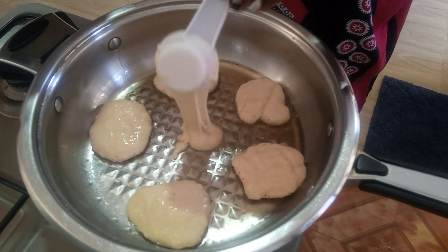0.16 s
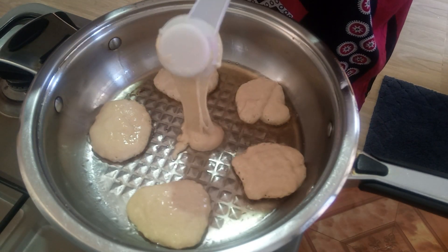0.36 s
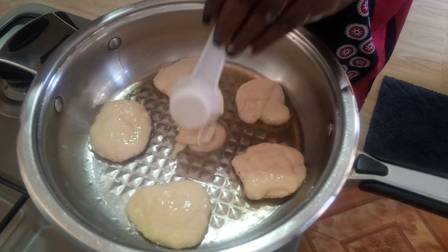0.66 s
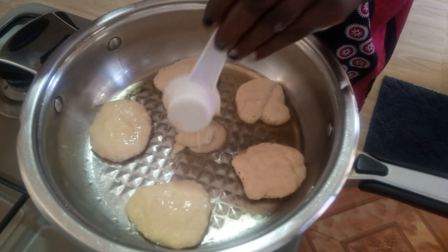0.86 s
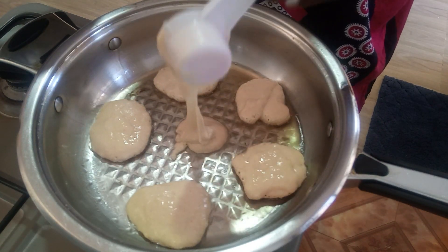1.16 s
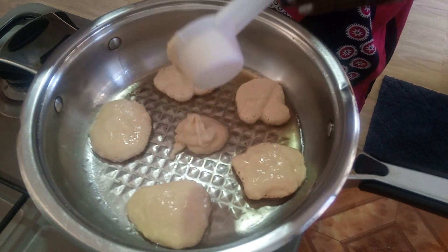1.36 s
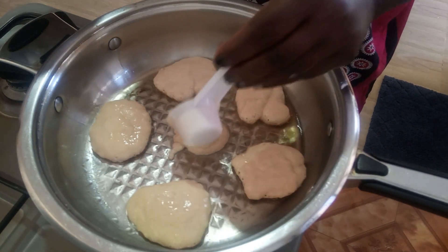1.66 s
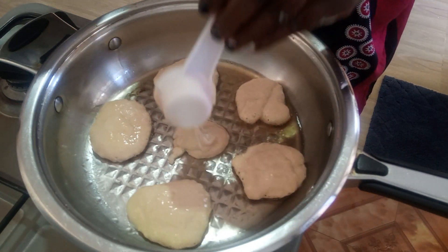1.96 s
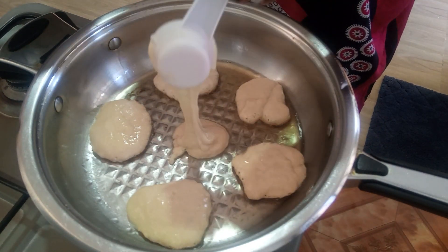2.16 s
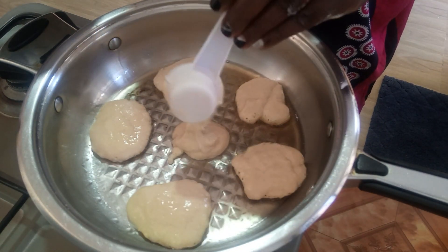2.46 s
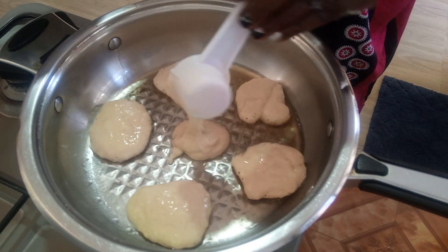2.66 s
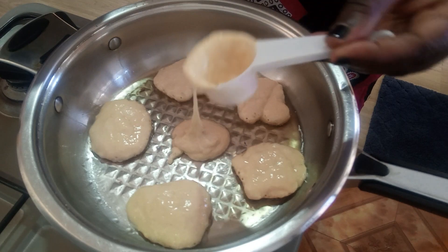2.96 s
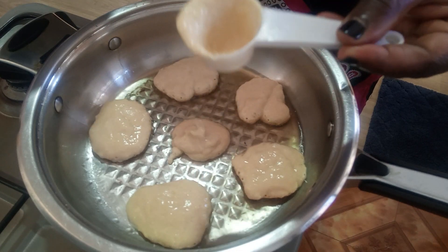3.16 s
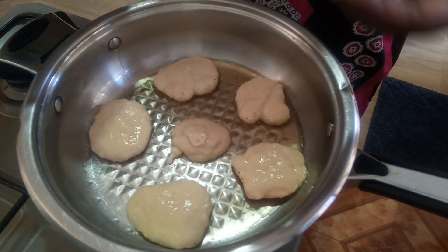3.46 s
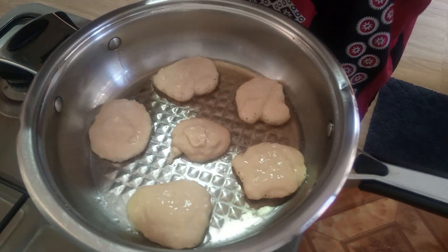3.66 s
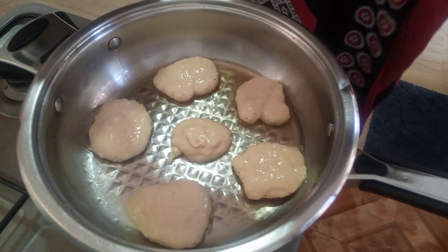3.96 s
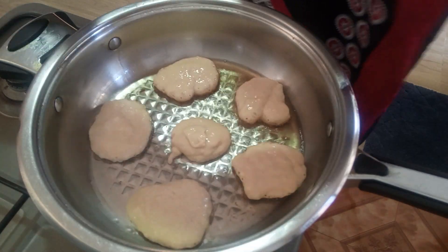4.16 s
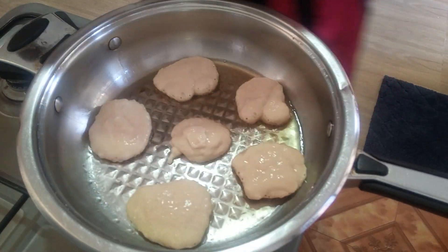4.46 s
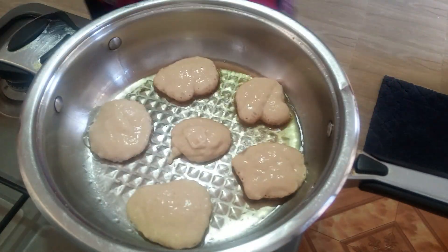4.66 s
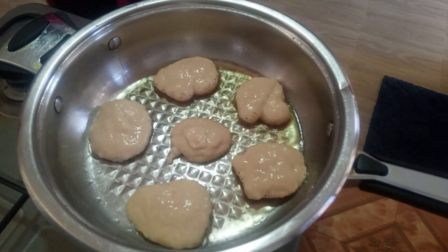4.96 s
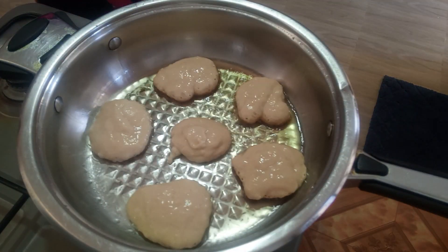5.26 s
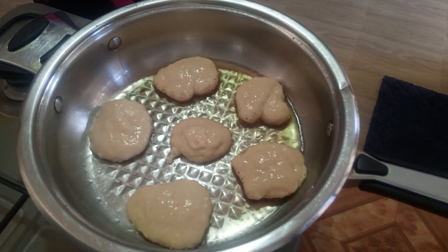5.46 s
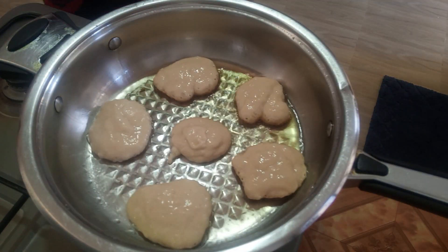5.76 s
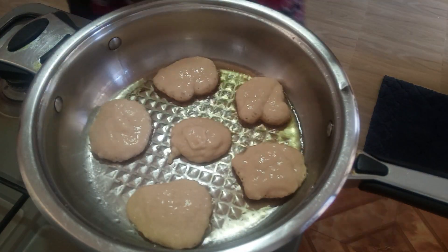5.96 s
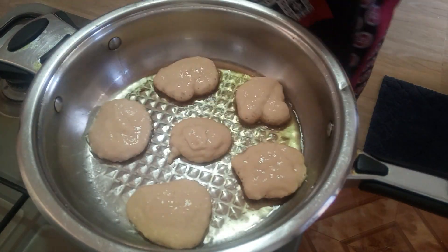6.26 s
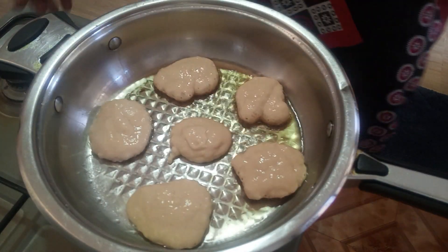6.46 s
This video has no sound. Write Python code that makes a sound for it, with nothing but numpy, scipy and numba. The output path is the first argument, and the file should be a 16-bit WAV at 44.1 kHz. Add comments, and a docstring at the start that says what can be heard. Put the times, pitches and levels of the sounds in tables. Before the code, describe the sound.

Spoonfuls of batter fry in shallow oil in a steel pan, heard very close and in mono in a small kitchen. A dense, bright sizzle runs throughout, with crisp spits and a soft, wavering hollow bubbling beneath. A faint knock and scuff come after four seconds, then a solid dull thud, a softer one, and a light clatter near six seconds while the oil spits harder.

```python
"""Batter frying in a steel pan

Spoonfuls of batter fry in shallow oil, heard close up in mono in a small kitchen.
Thousands of random impulses ring short resonances as bursting steam bubbles; snaps with brief rings are spits.
The air in the pan hums through a gliding resonance, its pitch shifting as a hand moves over it.
Later the cook puts things aside: decaying modes give two dull thuds and two very faint ones,
and filtered noise and impulses give light knocks and scuffs, over a faint low rush and mains hum."""
import sys
import numpy as np
from scipy import signal
from scipy.fft import rfft, irfft
from scipy.io import wavfile
from scipy.ndimage import uniform_filter1d
from numba import njit

SR = 44100
rng = np.random.default_rng(int(sys.argv[2]) if len(sys.argv) > 2 else 0)


def persist_wave(psi):
    """Save psi, clipped to +-1, as 16-bit WAV."""
    counts = np.round(np.clip(psi, -1, 1) * 32767).astype(np.int16)
    wavfile.write(sys.argv[1], SR, np.atleast_2d(counts).T)


N = 291942
TIME = np.arange(N) / SR  # s
FLUTTERS_PER_S = 31  # pace of the uneven stirring of air and sputter


def undb(db):
    """Decibels to gain."""
    return 10 ** (np.asarray(db) / 20)


def level(x, db, span=None):
    """Scale x to an rms level, taken over its first span seconds or over all of it."""
    head = x if span is None else x[:int(span * SR)]
    return x * undb(db) / np.sqrt(np.mean(head ** 2))


def curves(rows):
    """Each column of a table after the time, as a control sample by sample."""
    s, *columns = np.transpose(rows)
    return [np.interp(TIME, s, column) for column in columns]


def add(out, s, x):
    """Mix x into out from time s."""
    i = int(s * SR)
    out[i:i + len(x)] += x[:N - i]


def fade(t60):
    """One second of exponential decay, falling 60 dB in t60 seconds."""
    return np.exp(-np.log(1000) * TIME[:SR] / t60)


def cut(x, order, hz, kind="low"):
    """Butterworth filter: "low" keeps what lies below hz, "high" what lies above."""
    return signal.sosfilt(signal.butter(order, hz, kind, fs=SR, output="sos"), x)


def colour(x, points):
    """Filter by a gain curve of (Hz, dB) points, joined along log frequency."""
    hz, db = np.transpose(points)
    f = np.maximum(np.fft.rfftfreq(len(x), 1 / SR), 1)
    gain = undb(np.interp(np.log(f), np.log(hz), db))
    return irfft(rfft(x) * gain, len(x))


@njit
def svf(x, g, k):
    """State-variable band-pass whose tuning g and damping k may move."""
    y, b, l = np.empty(len(x)), 0., 0.
    for i in range(len(x)):
        v = (b + g[i] * (x[i] + 1e-18 - l)) / (1 + g[i] * (g[i] + k[i]))
        b, l, y[i] = 2 * v - b, l + 2 * g[i] * v, k[i] * v
    return y


def resonate(x, hz, width_hz):
    """One resonance, gain 1 at its centre."""
    angle = 2 * np.pi * np.minimum(hz, .45 * SR) / SR * np.ones(len(x))
    return svf(x, np.tan(angle / 2), 2 * np.pi * width_hz / SR / np.sin(angle))


def resonate_twice(x, hz, width_hz):
    """Two equal resonances in a row, for steeper skirts."""
    return resonate(resonate(x, hz, width_hz), hz, width_hz)


def walk(rate):
    """Smooth random wander around 0 with a spread near 1, taking about rate steps a second."""
    k = int(SR / rate)
    steps = np.repeat(rng.standard_normal(N // k + 1), k)
    return np.sqrt(2) * uniform_filter1d(uniform_filter1d(steps, k), k)[:N]


def bursts(rate, spread_db, most_db=22):
    """Impulses at random moments, about rate a second: many small, a few large."""
    size = undb(np.minimum(spread_db * rng.exponential(size=N), most_db))
    return (rng.random(N) < rate / SR) * size * rng.choice([-1, 1], N)


def echoes(x, delay, t60, db):
    """Add a cloud of reflections that starts after a delay and dies away."""
    cloud = (rng.standard_normal(SR) * fade(t60))[:len(x)]
    cloud = np.r_[np.zeros(int(delay * SR)), cloud / np.linalg.norm(cloud)]
    return x + undb(db) * signal.fftconvolve(x, cloud)[:len(x)]


def moving_echoes(x, delay, share, sway, count=3):
    """Reflections off the cook's moving hand and body carve shifting hollows into a sound."""
    out = x
    for k in range(count):
        lag = delay * 1.7 ** k + sway * walk(3.5)
        out = out + share * np.interp(TIME - lag, TIME, x)
    return out


def steady(x, db):
    """Hold the slow level of x to a curve in dB, leaving its quick flutter."""
    size = SR // 12
    power = uniform_filter1d(uniform_filter1d(x ** 2, size), size)
    return x * undb(db) / np.sqrt(power)


def sizzle():
    """Tiny steam bubbles burst at random, each ringing a few cycles in one of ten pitch bands."""
    # the frying as it swells and sinks, before small trims:
    # (time [s], level of the bursting bubbles [dB], level of the finest fizz [dB])
    sizzle_levels = [(0.0, -55.5, -54.5), (0.42, -57.5, -57.5), (1.73, -56.5, -57), (2.51, -57.5, -57),
                     (2.86, -57, -58.5), (3.37, -59, -58.5), (4.46, -55.5, -57.5), (4.61, -57.5, -60),
                     (5.07, -56, -58.5), (5.79, -56.5, -59), (6.23, -55, -58.5), (6.62, -53, -54.5)]
    # colour of the bursting oil up close: (frequency [Hz], relative gain [dB])
    sizzle_colour = [(400, -26), (1200, -14.5), (2400, -7.5), (2800, 4), (3150, -3), (3450, 3.5),
                     (4200, 3.5), (4900, 2), (6900, 3.5), (7800, -7), (9000, -11.5), (13000, -7.5),
                     (16000, -12)]
    bubble_db, fizz_db = curves(sizzle_levels)
    grains = 0
    for hz in np.geomspace(2000, 15000, 10):
        band = resonate(bursts(rate=1100, spread_db=2.5, most_db=30.5), hz, 0.37 * hz)
        grains = grains + level(band, 0) * np.sqrt(hz) * undb(2.47 * walk(17))
    snaps = bursts(rate=1200, spread_db=1.5, most_db=18)
    # their countless reflections merge into a smooth hiss
    wash = level(rng.standard_normal(N), -2.7) * undb(.5 * walk(46))
    sound = colour(level(grains, 0) + level(snaps, -2.3) + wash, sizzle_colour)
    # bubbles below 8 kHz, fizz above, each with its own level curve
    bubbles = signal.sosfiltfilt(signal.butter(8, 8000, fs=SR, output="sos"), sound)
    fizz = sound - bubbles
    return level(bubbles, 0.66) * undb(bubble_db) + level(fizz, 1.0) * undb(fizz_db)


def spit(db, hz, snap_db):
    """A pocket of steam breaks through the oil: a snap and a very short ring."""
    impulse = signal.unit_impulse(8192)
    # the ring is 1550 Hz wide at 6 kHz with snap and ring equal; snappier spits ring more broadly
    width_hz = 1550 * np.sqrt(hz / 6000) * 2 ** (snap_db / 40)
    ring = level(resonate(resonate(impulse, hz, width_hz), hz, 3 * width_hz), 0)
    crack = level(resonate_twice(impulse, 10600, 38000), snap_db)
    pop = cut(ring + crack, 2, 2000, "high")
    # each spot has its own paths via the pan wall
    pop = echoes(pop, delay=0.0006, t60=0.015, db=-4.5)
    # the kitchen gives back less of the highest pops
    pop = echoes(pop, delay=0.0049, t60=0.15, db=-12.5 - 1.4 * np.log2(hz / 6000))
    return level(pop, db - 1.5, span=.005)


def spits():
    """The oil spits loudly at set moments, and faintly at random in between."""
    # the loudest spits: (time [s], level over the first 5 ms before a 1.5 dB cut [dB],
    # pitch [Hz], snap relative to ring [dB])
    loud_spits = [(0.0522, -37.5, 12100, -6), (0.1262, -43, 4900, 9), (0.6428, -42.5, 13600, 1),
                  (0.8089, -44, 6500, -14), (1.072, -41, 13700, -3), (1.4144, -40.5, 7300, -3),
                  (1.4767, -47, 9300, -16), (1.7392, -41, 6960, 19), (1.808, -46.5, 8850, -2),
                  (1.947, -45.5, 4260, 15), (2.0183, -47, 10700, -20), (2.134, -37, 6560, 3),
                  (2.18, -43.5, 8740, -16), (2.676, -47.5, 6800, 2), (2.7448, -43, 11000, -14),
                  (2.8196, -41.5, 5370, 0), (2.8717, -36, 6400, -3.5), (2.8898, -45, 11400, -12),
                  (2.919, -48, 6800, -16), (3.0016, -47, 13900, -12), (3.291, -45.5, 6100, 5),
                  (3.333, -53, 9000, -8), (3.5536, -44, 7000, 4), (4.0852, -40, 4570, 7),
                  (4.084, -41, 11900, 27), (4.0976, -45, 11800, 5), (4.1514, -42.5, 7000, -3),
                  (4.2906, -31.5, 12500, -3), (4.4657, -45, 13400, 4), (4.4907, -32, 12100, 12),
                  (4.781, -43, 4530, 1), (4.8973, -47, 10800, -10), (4.9122, -44.5, 6300, 5),
                  (4.9412, -46, 3520, 4), (4.996, -45, 13600, 2), (5.2062, -43.5, 7540, -17),
                  (5.2257, -39.5, 6800, 6), (5.2675, -38, 14100, -3), (5.3204, -35, 4180, -14),
                  (5.415, -43, 4420, -5), (5.6434, -40, 5870, -4), (5.6451, -33.5, 5300, -8),
                  (5.6652, -48, 6400, 6), (5.69, -40.5, 3680, -7), (5.7977, -47, 9700, -7),
                  (5.8578, -43.5, 5400, 6), (5.8752, -29.5, 6040, -6), (5.9727, -37, 5900, -6),
                  (6.1116, -38, 5570, -7), (6.1136, -29.5, 5530, -6), (6.1175, -36.5, 5950, -3),
                  (6.2091, -41, 6600, -4), (6.2432, -39, 14000, 0), (6.246, -30, 5730, 5),
                  (6.257, -40, 11700, -17), (6.2793, -41, 5570, 15), (6.355, -45.5, 7200, -5),
                  (6.5489, -43, 5270, 8)]
    faint_per_s, faint_db, spread_db, faint_snap_db = 4.0, -50, 3.5, -5  # level before the same cut
    low_hz, high_hz = 5700, 13200
    out = np.zeros(N)
    for s, db, hz, snap_db in loud_spits:
        add(out, s, spit(db, hz, snap_db))
    # 64 candidates, of which chance keeps about faint_per_s each second
    for when, size, pitch, chance in rng.random((64, 4)):
        hz = low_hz * (high_hz / low_hz) ** pitch
        pop = spit(faint_db + spread_db * (2 * size - 1), hz, faint_snap_db)
        if chance * 64 < faint_per_s * TIME[-1]:
            add(out, when * TIME[-1], pop)
    return out


def pings():
    """A flying drop of oil leaves one thin, short ring in the steel: a decaying sine."""
    # drops on the steel: (time [s], level over the first 4.1 ms [dB], pitch [Hz], t60 [s])
    drops = [(5.6455, -49, 5200, 0.081), (5.6904, -48, 4170, 0.088), (6.1122, -41, 5810, 0.079)]
    out = np.zeros(N)
    for s, db, hz, t60 in drops:
        tone = np.sin(2 * np.pi * hz * TIME[:SR]) * fade(t60)
        add(out, s, level(tone, db, span=0.0041))
    return out


def ring_steel(x):
    """The steel of the pan answers a sound with its narrow resonances."""
    # ringing of the steel: (frequency [Hz], width [Hz], gain [dB])
    pan_modes = [(548.3, 10, 13), (926, 14, 11)]
    return sum(undb(db) * resonate(x, hz, width_hz) for hz, width_hz, db in pan_modes)


def pan_air():
    """The bubbling stirs the air in the pan, whose resonance follows the hand above it and rings the steel."""
    # the air in the pan as the hand moves over it: (time [s], lowest resonance [Hz])
    air_pitch = [(0, 713), (0.16, 737), (0.38, 600), (0.46, 714), (0.54, 634), (0.59, 830), (0.68, 660),
                 (0.92, 820), (1.03, 726), (1.29, 820), (1.36, 710), (1.5, 770), (1.55, 650), (1.65, 710),
                 (1.85, 736), (2.01, 787), (2.17, 700), (2.25, 900), (2.31, 656), (2.6, 694), (2.67, 613),
                 (2.8, 614), (2.98, 783), (3.48, 608), (3.64, 720), (3.86, 550), (4.05, 700), (4.46, 734),
                 (4.66, 660), (5.02, 758), (5.4, 560), (5.9, 633), (6.38, 774), (6.62, 687)]
    # level of that resonance together with the steel it rings: (time [s], level [dB])
    air_level = [(0, -56.5), (0.14, -65.5), (0.33, -68), (0.48, -63.5), (0.63, -70.5), (0.7, -65.5),
                 (0.8, -69.5), (0.92, -62.5), (1.02, -68), (1.11, -65.5), (1.22, -68.5), (1.32, -66.5),
                 (1.38, -66.5), (1.46, -64.5), (1.55, -77), (1.69, -65.5), (1.85, -66), (1.95, -65),
                 (2.13, -66.5), (2.21, -70.5), (2.33, -66), (2.48, -72.5), (2.58, -67), (2.7, -63),
                 (2.78, -66.5), (2.85, -72.5), (2.96, -63), (3.08, -70.5), (3.2, -66), (3.38, -70.5),
                 (3.55, -65.5), (3.76, -74), (3.88, -68), (4.0, -85), (4.13, -72), (4.3, -67.5),
                 (4.44, -74.5), (4.54, -65), (4.8, -66.5), (5.03, -69.5), (5.45, -59.5), (5.85, -60),
                 (6.0, -63.5), (6.3, -65), (6.62, -63.5)]
    [hz], [air_db] = curves(air_pitch), curves(air_level)
    stirring = bursts(rate=1500, spread_db=1.5)
    air = resonate(resonate(stirring, hz * (1 + 0.025 * walk(22)), 130), hz, 210)
    air = cut(air, 6, 470, "high")
    air = moving_echoes(air, delay=0.00285, share=0.3, sway=0.00075)
    air = air * undb(1.0 * walk(FLUTTERS_PER_S))
    return steady(air + undb(-0.5) * ring_steel(air), air_db)


def sputter():
    """Larger bubbles sputter through broad, overlapping resonances that wander and sink away now and then."""
    # resonances of the sputter: (centre [Hz], level before the sinking [dB])
    sputter_modes = [(1170, -3), (1380, 2), (1560, -5.5), (1740, -1), (1930, -3), (2120, -4.5), (2310, 1),
                     (2520, -12)]
    # slow level of the whole sputter: (time [s], level [dB])
    sputter_level = [(0, -62.5), (0.2, -66.5), (0.33, -65), (0.62, -69), (0.92, -65), (1.06, -72),
                     (1.33, -68), (1.55, -69.5), (1.91, -64.5), (2.07, -72), (2.32, -64.5), (2.48, -66.5),
                     (2.57, -78), (2.66, -68.5), (3.22, -68), (3.36, -74), (3.55, -79.5), (3.74, -69),
                     (3.84, -76), (3.92, -72), (4.02, -73.5), (4.45, -66.5), (4.55, -63), (4.79, -62.5),
                     (5.03, -67), (5.87, -62), (6.0, -69), (6.3, -61.5), (6.62, -62)]
    width_hz, drift, hollow_db, hollows_per_s = 250, 0.035, 7, 13  # drift as a share of the pitch
    [sputter_db] = curves(sputter_level)
    sound = 0
    for centre_hz, db in sputter_modes:
        centre = centre_hz * (1 + drift * walk(9))
        mode = resonate_twice(bursts(rate=1200, spread_db=1.0), centre, width_hz)
        sound = sound + level(mode, db) * undb(-hollow_db * np.abs(walk(hollows_per_s)))
    sound = moving_echoes(sound, delay=.0019, share=0.47, sway=0.000402)
    return steady(sound * undb(1.3 * walk(FLUTTERS_PER_S)), sputter_db)


def thuds():
    """Padded blows ring the furniture's modes; a lower upper limit leaves mostly the low ones."""
    # modes of the furniture: (frequency [Hz], level before tilt and wobble [dB], t60 before the choke [s])
    thud_modes = [(100.4, -13.5, 0.48), (131.5, -17.5, 0.34), (152.4, -16, 0.31), (166.5, -11.5, 0.68),
                  (197, -11, 0.3), (231, -18.5, 0.36), (261, -12, 0.27), (330, -13.5, 0.29),
                  (384.6, -8, 0.27), (420.4, -9, 0.17), (469, -5, 0.3), (510, -6, 0.24), (550, 2.5, 0.12),
                  (572, -11, 0.15), (668, -5, 0.23), (694, -13.5, 0.55), (735, -18, 0.24), (760, -6, 0.25),
                  (836, -15, 0.33), (885, -19, 0.13), (970, -26, 0.4), (1100, -16, 0.18), (1220, -12, 0.2)]
    # the blows: (time [s], level over the first 47 ms [dB], brightness [dB per octave], upper limit [Hz])
    thud_blows = [(5.2361, -27.5, 0.2, 1000), (5.4929, -38, -6, 597), (6.06, -65.5, 2.5, 248),
                  (6.093, -64, 5.5, 248)]
    choke_s, choke_slope = 0.29, 0.25  # the lowest mode is choked after this long, higher ones sooner
    wobble_depth_db, wobbles_per_s = 3.5, 30.5  # each mode dies unevenly
    out, t = np.zeros(N), TIME[:SR]
    for s, db, tilt_db, top_hz in thud_blows:
        ring = np.zeros(SR)
        for hz, mode_db, t60 in thud_modes:
            phase = rng.uniform(-2.12, 1) * 1.2
            tone = np.sin(2 * np.pi * hz * t + phase) * fade(t60)
            # the room blurs each mode briefly
            blur = resonate_twice(rng.standard_normal(SR), hz, 0.3 * hz)
            blur = level(blur, -12) * fade(1.5 * t60)
            # low modes take longer to build up
            onset = 1 - np.exp(-t * hz / 0.53)
            ratio = hz / thud_modes[0][0]
            choke = np.exp(-(t * ratio ** choke_slope / choke_s) ** 10)
            wobble_db = wobble_depth_db * walk(wobbles_per_s)[:SR]
            gain = undb(mode_db + tilt_db * np.log2(ratio) + wobble_db)
            ring += gain * (tone + blur) * onset * choke
        # the blow itself, a couple of cycles long
        push = resonate(resonate(signal.unit_impulse(SR), 418, 180), 320, 470)
        body = level(ring, 0, span=0.073) + level(push, -6.5, span=0.07)
        padded = cut(cut(body, 6, top_hz), 4, 76, "high")
        add(out, s, level(padded, db, span=0.047))
    return out


def knocks():
    """Utensils put down: a light blow and a short noisy rattle ring one broad resonance."""
    # the knocks: (time [s], level over the first 23 ms [dB], pitch [Hz], width [Hz], t60 of the rattle [s])
    light_knocks = [(4.163, -52, 616, 150, 0.28), (4.19, -59, 635, 190, 0.3), (4.236, -62, 860, 500, 0.16),
                    (4.261, -61, 1090, 450, 0.15), (6.0605, -43, 744, 250, 0.11),
                    (6.079, -51, 790, 322, 0.15), (6.097, -51.5, 550, 300, 0.14)]
    out = np.zeros(N)
    for s, db, hz, width_hz, t60 in light_knocks:
        blow = 16 * signal.unit_impulse(SR) + rng.standard_normal(SR) * fade(t60)
        ring = resonate(resonate(blow, hz, width_hz), hz, 3 * width_hz)
        add(out, s, level(cut(ring, 4, 470, "high"), db, span=0.023))
    return out


def scuffs():
    """Dense little slips merge into a rough rub that swells and dies away in one broad resonance."""
    # things slid along the worktop: (time [s], rise [s], length [s], rms level at the peak of the swell [dB],
    # centre [Hz], width [Hz])
    slides = [(4.083, 0.089, 0.27, -59, 1600, 1200), (4.522, 0.014, 0.11, -46.5, 3000, 2820),
              (6.012, 0.007, 0.14, -50.5, 1880, 1310), (6.022, 0.03, 0.4, -52, 910, 1020),
              (6.11, 0.045, 0.11, -48, 2190, 1100), (6.142, 0.051, 0.056, -55.5, 385, 328),
              (6.182, 0.0095, 0.088, -48, 2290, 900)]
    out = np.zeros(N)
    for s, rise, length, db, hz, width_hz in slides:
        # the rubbing catches and lets go, 1 dB at about 120 steps a second
        slips = bursts(rate=4400, spread_db=10.0, most_db=14.5) * undb(1 * walk(120))
        rub = resonate_twice(slips[:SR], hz, width_hz)
        swell = np.interp(TIME[:SR], [0, rise, length], [0, 1, 0])
        add(out, s, level(rub, db) * swell)
    return out


def kitchen():
    """A faint low rush of coloured noise and the slightly wavering mains hum of an appliance."""
    # colour of the room's rush, ahead of a 900 Hz low-pass: (frequency [Hz], relative gain [dB])
    room_colour = [(25, -11), (60, -13.5), (120, -7.5), (220, -9), (340, -13), (480, -0.5), (900, -27)]
    # mains hum of an appliance: (frequency [Hz], level [dB])
    hum_tones = [(100, -95), (190, -100), (199, -91.5), (248, -99.5), (297, -94), (398, -109), (447, -91.5)]
    rush = cut(colour(rng.standard_normal(N), room_colour), 2, 900)
    hum = 0
    for hz, db in hum_tones:
        tone = np.sin(2 * np.pi * hz * TIME + 1.0 * walk(14.0))
        hum = hum + level(tone * undb(2.8 * walk(5.7)), db)
    return level(rush, -83.0) + hum


def scene():
    """The frying pan close to the microphone and the handling beside the stove, the same in both channels."""
    blows = thuds() + knocks()
    pan = pan_air() + sputter() + undb(-18.5) * ring_steel(blows)  # the blows jolt the steel too
    sound = sizzle() + spits() + pings() + pan + blows + scuffs() + kitchen()
    return np.array([sound, sound])


def record(dry):
    """The recorder cuts the top steeply above 15.9 kHz."""
    return signal.sosfilt(signal.ellip(10, .2, 80, 15900, fs=SR, output="sos"), dry)


dry = scene()
out = record(dry)
persist_wave(out)
```